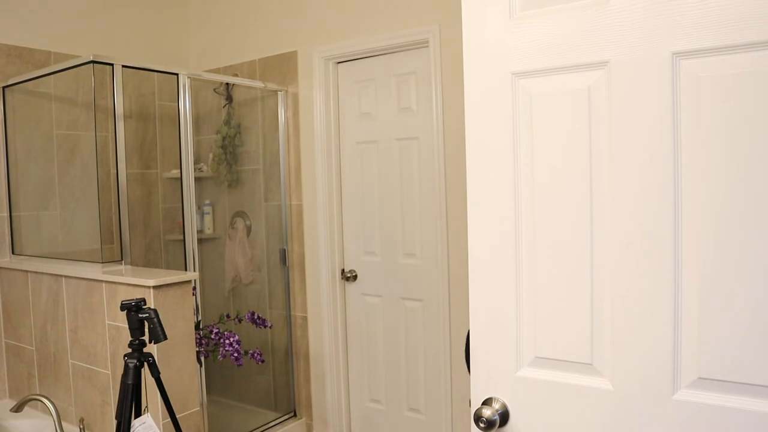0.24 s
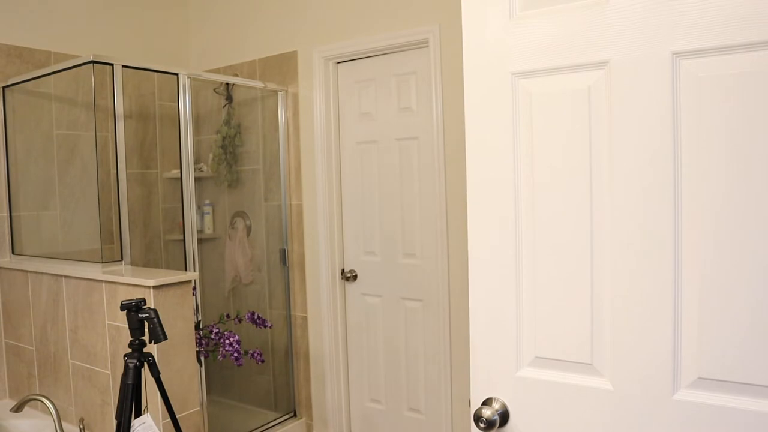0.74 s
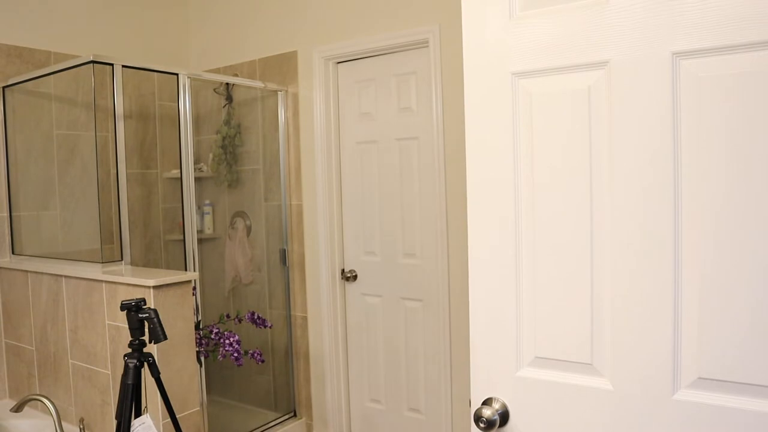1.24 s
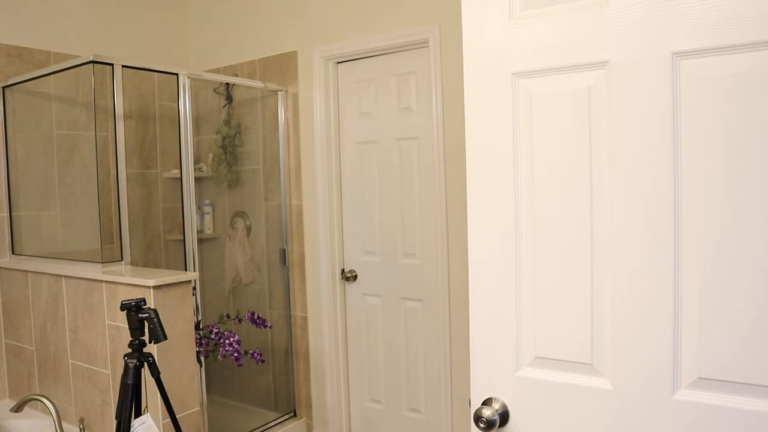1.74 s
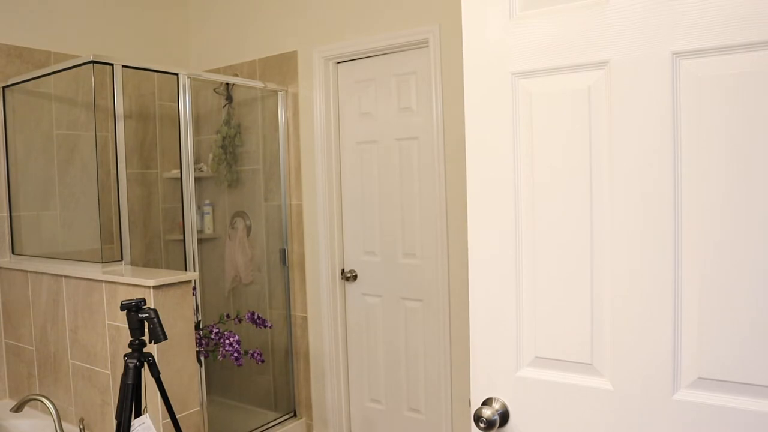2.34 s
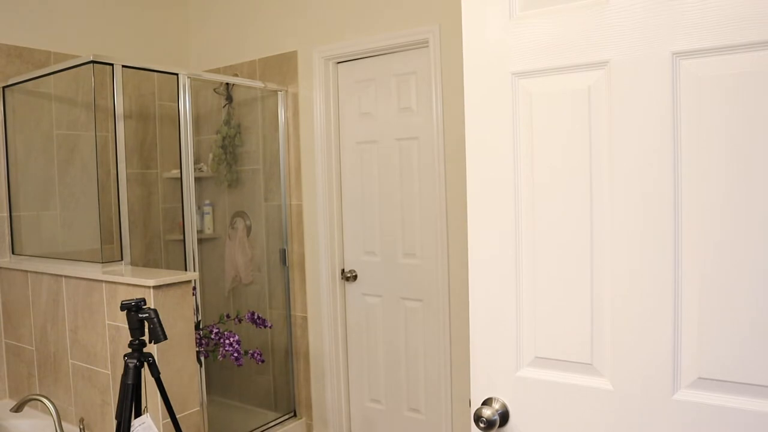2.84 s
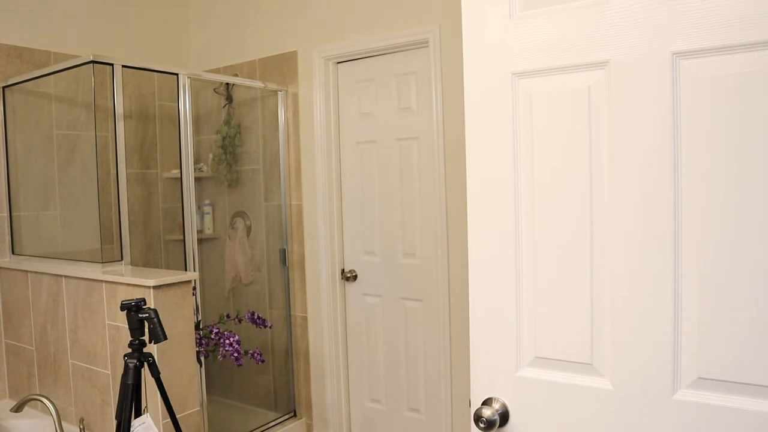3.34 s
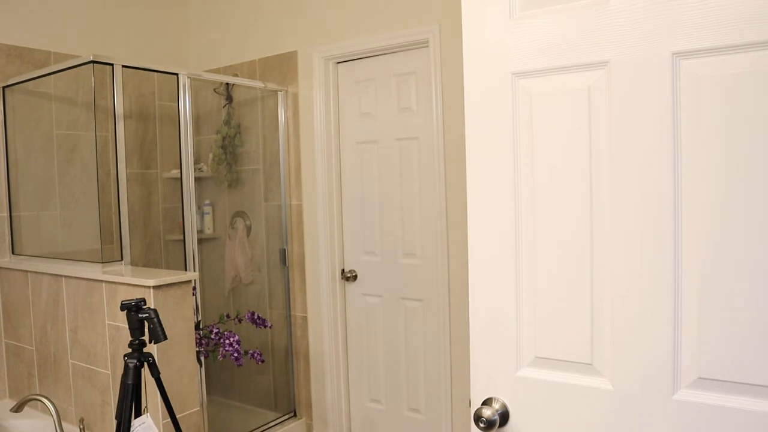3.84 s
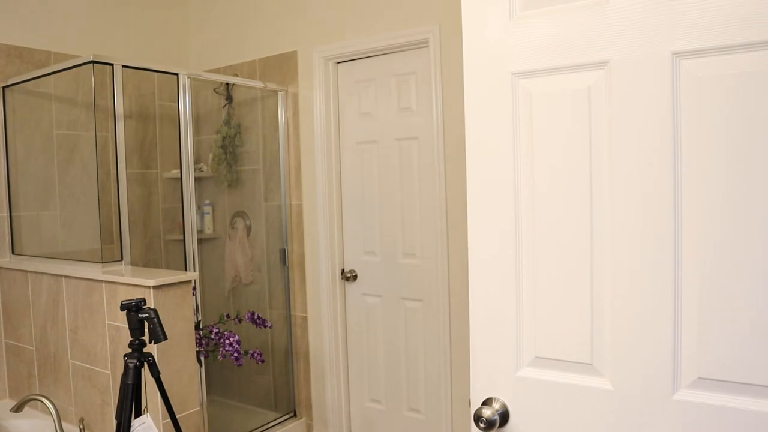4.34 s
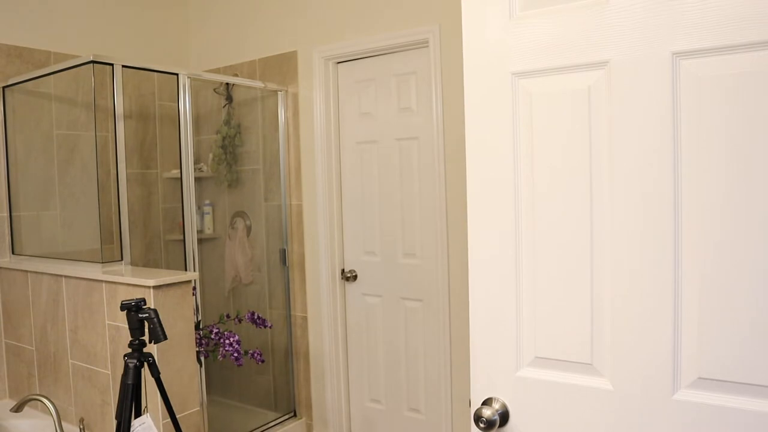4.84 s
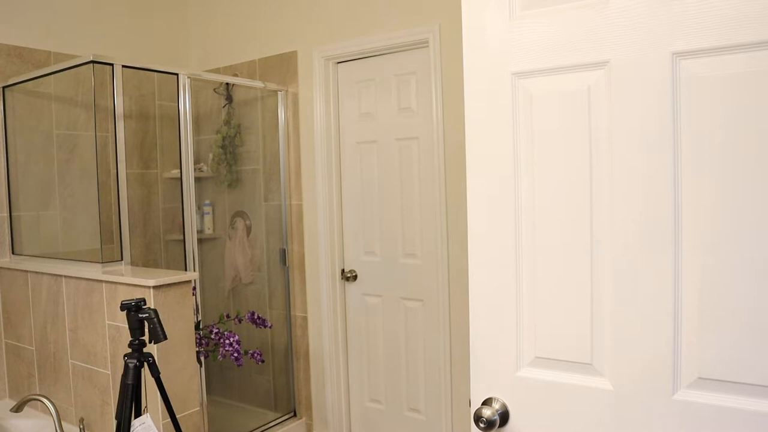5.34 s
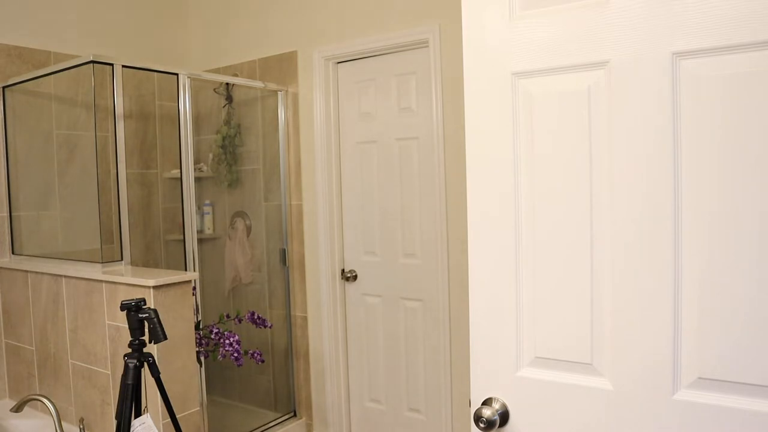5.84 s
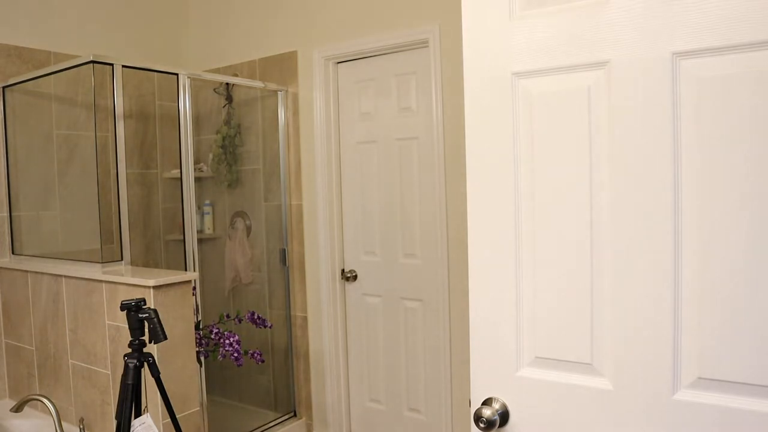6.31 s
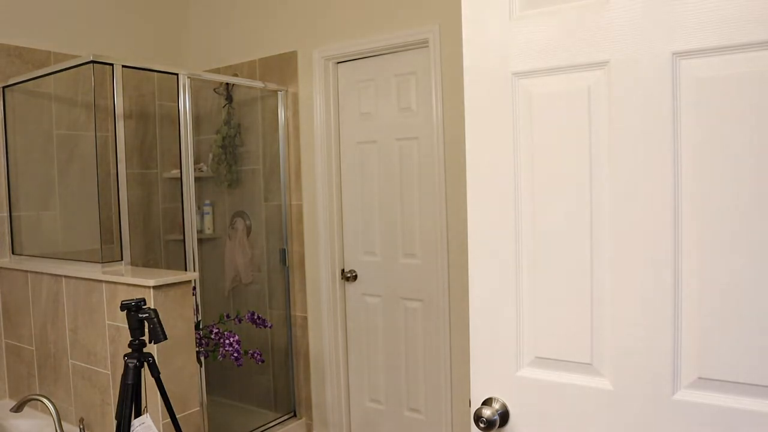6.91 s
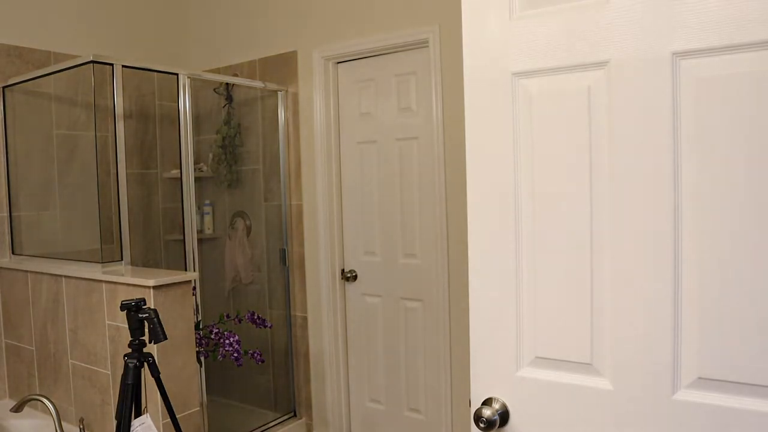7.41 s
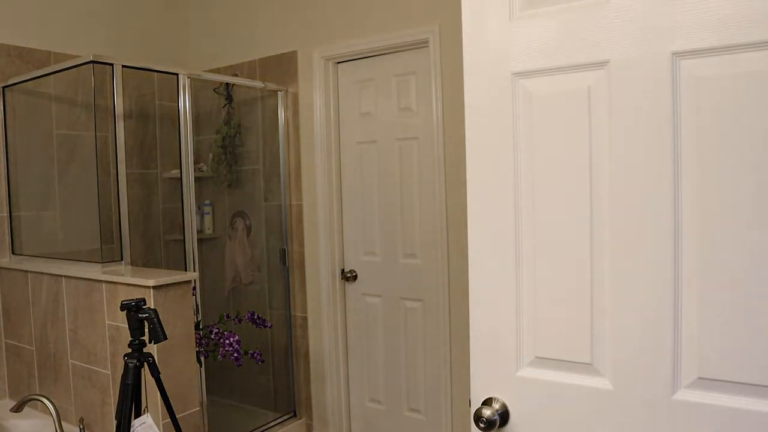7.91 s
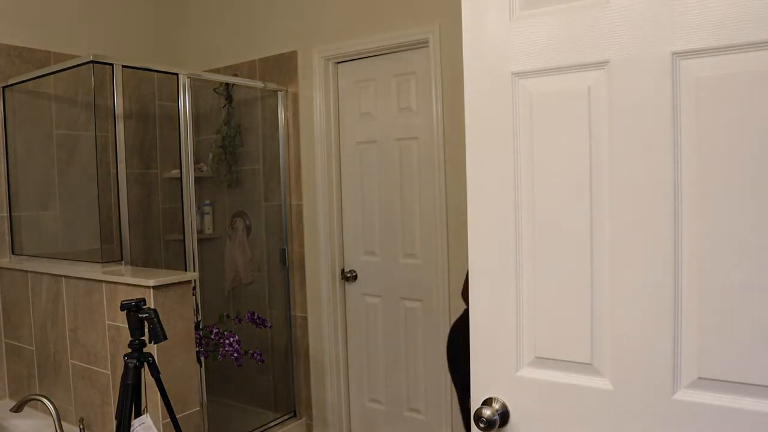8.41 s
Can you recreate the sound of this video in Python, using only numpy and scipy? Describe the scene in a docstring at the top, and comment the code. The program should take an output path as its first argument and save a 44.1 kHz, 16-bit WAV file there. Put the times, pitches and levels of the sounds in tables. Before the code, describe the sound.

Distant, reverberant stereo pickup of cabinet work in a hard bathroom: a quick opening thump, then clustered knocks and loose clatter with jar, tin and bottle clinks. A lull leaves only low air rumble and faint ticks. Short drawer slides end in heavy wooden slams, a brief gap follows, then the loudest slams, their echo dying away into light clothing rustle.

```python
"""Putting things away in a bathroom

Someone out of sight behind an open door puts things away in a tiled bathroom. Cupboard doors and drawers
knock, roll and slam: bursts of noise shake a ringing cabinet. Jars and other small things clink as sums of
fading tones, the cupboard air booms, and clothes swish as fine grains of noise. Knocks, rolls and clinks arrive
mostly as room echo made of fading noise. Filtered noise makes the ventilation rumble below it all.
"""
import sys
import numpy as np
from scipy import signal
from scipy.fft import rfft, irfft, next_fast_len
from scipy.io import wavfile
from scipy.ndimage import uniform_filter1d

SR = 44100
rng = np.random.default_rng(int(sys.argv[2]) if len(sys.argv) > 2 else 0)


def generate_wav(signal):
    """Clip the signal to [-1, 1] and save it as 16-bit WAV at the path in sys.argv[1]."""
    frames = np.transpose(np.atleast_2d(signal))
    scaled = np.clip(frames, -1, 1) * 32767
    pcm = np.round(scaled).astype(np.int16)
    wavfile.write(sys.argv[1], SR, pcm)


N = 382347

# Tones of the small hard things that the list of taps names:
# (pitch_hz, level_db against each other, fade_s for a fall of 60 dB)
JAR = [(2264, 5, 0.024), (4800, -5.5, 0.013)]
BOTTLES = [(1573, 15, 0.08), (1570, 4, 0.063), (2660, 7.5, 0.11), (3600, 1, 0.093), (3880, -1, 0.1),
           (4750, 4.5, 0.076), (5460, -4, 0.05)]
CUP = [(1210, 1.8, 0.099), (3830, 0.19, 0.027)]
BOX = [(684, 1, 0.17), (1410, -9, 0.085)]
TUB = [(727, 3.5, 0.068), (2120, 16.5, 0.0044), (3210, 0, 0.03)]
CATCH = [(4080, 20, 0.0098), (3900, 11, 0.0085), (1850, 8, 0.028), (5700, 7, 0.01), (8150, 11, 0.0064)]
CAP = [(1800, 0, 0.005)]
TIN = [(2118, 14, 0.062), (3340, 4, 0.05), (4430, 2, 0.11)]


def undb(db):
    """Turn a level in dB into a plain gain."""
    return 10 ** (np.asarray(db) / 20)


def level(x, db):
    """Scale a sound to an rms (average) level in dB."""
    return x * undb(db) / np.sqrt(np.mean(x ** 2))


def colour(x, points):
    """Filter by (Hz, dB) points joined by lines on a log-frequency axis."""
    hz, db = np.transpose(points)
    size = next_fast_len(len(x))
    bins = np.maximum(np.arange(size // 2 + 1) * SR / size, 1)
    gains = undb(np.interp(np.log(bins), np.log(hz), db))
    return irfft(rfft(x, size) * gains, size)[:len(x)]


def even(x, width_hz):
    """Level out chance peaks of the spectrum that are broader than the width."""
    spectrum = rfft(x)
    bins = int(width_hz * x.shape[-1] / SR) + 1
    local_power = uniform_filter1d(np.abs(spectrum) ** 2, bins)
    return irfft(spectrum / np.sqrt(local_power), x.shape[-1])


def line(points):
    """Gain along (s, dB) points, practically silent outside them."""
    s, db = np.transpose(points)
    return undb(np.interp(np.arange(N) / SR, s, db, left=-200, right=-200))


def ring(modes, seconds=.5):
    """A struck thing's fading tones after one blow, scaled to unit energy."""
    t = np.arange(int(seconds * SR)) / SR
    y = 0
    for hz, db, t60 in modes:
        fade = np.exp(-np.log(1000) * t / t60)  # down 60 dB after t60 seconds
        y = y + undb(db) * np.sin(2 * np.pi * hz * t) * fade
    return y / np.sqrt(np.sum(y ** 2))


def through(x, response):
    """Let a sound excite a response (convolution), cut to the scene's length."""
    return signal.fftconvolve(x, response)[:N]


def grit(per_s, scatter_db):
    """Random small impacts of uneven size, rms 1."""
    hits = (rng.random(N) < per_s / SR) * rng.standard_normal(N)
    unevenness = np.minimum(rng.exponential(size=N), 2)
    return level(hits * undb(scatter_db * unevenness), 0)


def knocks(sharpness=3.85, edge_s=0.002, count=4):
    """Doors, drawers and things set down: quickly dying bursts of contacts, taking turns at a few places."""
    # Blows: (start_s, panel_force_db, thud_db over panel, crack_db over panel, panel_pitch_hz,
    # hardness in dB per octave of treble tilt)
    blows = [(0.223, 11.5, -20, 1, 560, 3), (0.233, 17, -4.5, -5, 606, -3.5),
             (0.286, 4.5, 9, -7, 423, -2.5), (0.757, 3, 16, -6, 710, 1.5), (0.779, 8.5, 8, -11.5, 700, 1.5),
             (0.886, -1.5, 15, -1.5, 490, 3), (1.006, 13.5, 2.5, -9.5, 1060, 1.5),
             (1.02, 18.5, -11, -14, 465, -6.5), (1.312, -11.5, 20, 13.5, 538, 4),
             (1.453, -4.5, 13.5, -1, 750, -1), (1.556, 11, 3, -9.5, 1160, -5),
             (1.666, 9.5, 11, -4.5, 790, -2.5), (1.697, 9.5, -19, -4.5, 445, 2.5),
             (1.873, 22, 0.5, -9, 745, 4), (1.885, 25, -9, -12.5, 385, -6.5),
             (1.945, 13.5, -6, -16, 407, -6.5), (2.139, 16, 2.5, -8, 700, -3), (2.232, 12.5, 3, -9, 490, 7),
             (2.423, 18.5, -4.5, -11.5, 388, 4.5), (2.555, 8, -0.5, -6, 905, -0.5),
             (2.604, 11, 3, -9, 650, 3), (2.685, 12.5, 6.5, -16.5, 450, -4),
             (2.778, 3, 2, -15.5, 1180, -10.5), (2.911, 2.5, 6, -12.5, 1190, -2),
             (3.157, 2.5, 8, -5, 910, 3.5), (3.245, -5.5, 4, 3, 1110, 2),
             (3.395, -16.5, -13, 10.5, 1020, 1.5), (3.451, 4.5, 3, -10, 850, -5.5),
             (3.493, -3, 7.5, -16, 850, -12), (3.637, 3, -22, -3, 850, -2.5), (3.694, 4, 4, -7, 600, -3),
             (3.738, 10, -8, -7, 810, -6), (3.785, 3, 0.5, -6.5, 804, -6.5),
             (5.652, -0.5, 0, -1, 670, -1.5), (5.773, 13.5, 2, -7, 746, 2),
             (5.827, 9.5, 6.5, -13.5, 550, 3), (5.885, 9.5, 3, -12, 684, -2),
             (6.044, 27, -13, -11.5, 637, -2.5), (6.066, 25, -1, -5, 585, -1.5),
             (6.113, 23.5, 2.5, -11.5, 690, -3), (7.197, 11, -3.5, -9.5, 556, 6.5),
             (7.256, 30.5, -8, -13.5, 690, -7), (7.305, 19.5, 2.5, -14.5, 676, -1.5),
             (7.462, 32, -11.5, -13, 850, -2), (7.496, 18, -2, -25, 820, 3), (7.553, 26, -1.5, -7, 525, -2),
             (7.572, 24, 0, -13.5, 613, -3.5), (7.614, 12.5, -1, -28, 580, 12.5)]
    rattle_s = 0.0095  # time constant of the dying contacts
    thud_rise_s = 0.0041  # time constant: the carcass gives way slowly
    ripple_db, ripple_hz = 2.2, 130  # each struck edge has short resonances of its own: depth, spacing
    force, size = np.zeros((count, 3, N + SR)), SR // 5
    age_s = np.arange(size) / SR
    contacts = rng.standard_normal((len(blows), 3, size))
    edge_hz = np.arange(ripple_hz, SR / 4, ripple_hz)
    ripples = rng.standard_normal((len(blows), len(edge_hz)))
    for k, (s, db, thud_db, crack_db, hz, tilt_db) in enumerate(blows):
        burst = even(contacts[k] * np.exp(-age_s / rattle_s), 48)
        burst[:, size // 2:] = 0  # no rattle outlasts a tenth of a second
        thud, panel, crack = burst
        thud = thud * (1 - np.exp(-age_s / thud_rise_s))
        # the spot that is struck favours the panel tones near one pitch
        panel = signal.lfilter(*signal.iirpeak(hz, sharpness, fs=SR), panel)
        # the hard edges meet a moment after the first push
        crack = crack * (1 - np.exp(-age_s / edge_s))
        # harder contacts tilt the crack towards the treble
        crack = colour(crack, [(700, -2 * tilt_db), (11200, 2 * tilt_db)])
        crack = colour(crack, np.transpose([edge_hz, ripple_db * ripples[k]]))
        crack = crack * undb(-ripple_db / 2)
        gains = undb(db + np.array([[thud_db], [0], [crack_db]]))
        start = int(s * SR)
        force[k % count, :, start:start + size] += gains * np.array([thud, panel, crack])
    return [cabinet(*place[:, :N]) for place in force]


def cabinet(thud, panel, crack):
    """Forces on the frame (carcass), panels and hard surfaces, each through its own resonances."""
    # Tones of the frame and of its panels: (pitch_hz, level_db against each other, fade_s for 60 dB)
    carcass_modes = [(170.3, 1, 0.37), (221.8, 19, 0.045), (281.6, 17.5, 0.06), (295.6, 10, 0.084),
                     (345.6, 2.5, 0.14), (407, 4.5, 0.061)]
    panel_modes = [(404.4, 12.5, 0.03), (533, -5.5, 0.37), (574, -1, 0.17), (688.5, 9, 0.038),
                   (794, 11.5, 0.025), (882, -1, 0.018), (1095, 3.5, 0.052), (1351, 2, 0.091),
                   (2070, 0, 0.026)]
    # Colour of hard surfaces meeting: (frequency_hz, level_db per Hz, relative)
    crack_colour = [(400, -14), (900, -2.5), (1500, -3.5), (2400, -8.5), (3300, -14.5), (5000, -18.5),
                    (8500, -30.5), (12000, -32.5), (15000, -65)]
    noise = colour(rng.standard_normal(SR), crack_colour)
    bright = colour(crack, crack_colour) / np.std(noise)  # the colour alone adds no loudness
    return through(thud, ring(carcass_modes)) + through(panel, ring(panel_modes)) + bright


def rolls(thud_db=-3, panel_db=-6):
    """Drawer runners and loose contents bump along as random impacts and shake the same cabinet."""
    # Hands rummaging in the open drawers: (time_s, level_db before the shares below)
    rummage = [(0.8, -73), (0.95, -25.5), (1.14, -38), (1.36, -35), (1.57, -28), (2.16, -33), (2.34, -25),
               (2.64, -27.5), (2.92, -47), (3.13, -29.5), (3.28, -52), (3.55, -37), (3.7, -30.5),
               (3.94, -49.5), (4.6, -55)]
    # Drawers on their rails: (start_s, length_s, end_level_db before the shares below,
    # swell_db from start to end, a fall if negative)
    slides = [(5.707, 0.22, -23.5, 23), (5.941, 0.09, -15, 24), (7.191, 0.25, -38.5, -19),
              (7.366, 0.085, -13, 14)]
    hands_scrape_db, rails_scrape_db = -14, -15.5
    hands = line(rummage)
    rails = sum(line([(s, db - swell_db), (s + length, db)]) for s, length, db, swell_db in slides)
    body = (hands + rails) * grit(600, 2.9)
    scrape = undb(hands_scrape_db) * hands + undb(rails_scrape_db) * rails
    scrape = scrape * grit(2500, 3.1)
    return cabinet(undb(thud_db) * body, undb(panel_db) * body, scrape)


def clinks():
    """Small hard things: one sharp blow sets off each object's own fading tones."""
    # Small things struck: (start_s, blow_db, tones of the thing)
    taps = [(1.015, 2.5, JAR), (1.887, 4.5, TIN), (2.422, 6, BOTTLES), (2.621, -4, CUP), (4.14, -14.5, TUB),
            (4.27, -15.5, TUB), (5.401, -13, CATCH), (5.66, -3, BOX), (6.633, -11, CAP)]
    out = np.zeros(N + SR)
    for s, db, modes in taps:
        start = int(s * SR)
        out[start:start + SR // 2] += undb(db) * ring(modes)
    return out[:N]


def booms():
    """A door swung quickly pushes the cupboard's air, which rings low after each soft, uneven push."""
    # Air pushes: (start_s, push_db)
    pushes = [(0.26, 9.5), (5.777, 15.5), (6.068, 6), (7.254, 20), (7.501, -11)]
    # Tones of the air inside: (pitch_hz, level_db against each other, fade_s for 60 dB)
    cavity_modes = [(97, -7, 0.36), (127, 11, 0.3), (161.7, 18, 0.19)]
    push_s = 0.031  # the push is strongest after half of this
    force, size = np.zeros(N + SR), SR // 5
    age = np.arange(size) / (push_s * SR)
    puffs = rng.standard_normal((len(pushes), size))
    for (s, db), puff in zip(pushes, puffs):
        start = int(s * SR)
        force[start:start + size] += undb(db) * even(puff * age * np.exp(-2 * age), 48)
    # keep the low notes only
    return colour(through(force, ring(cavity_modes)), [(25, -14), (60, 0), (200, 0), (400, -30)])


def swish():
    """Cloth sliding on cloth: dense fine grains, each stroke swelling and fading."""
    # Strokes: (peak_s, peak_level_db, rise_s, fall_s)
    strokes = [(0.045, -54, 0.017, 0.41), (5.278, -57.5, 0.03, 0.18), (8.25, -46.5, 0.092, 0.11),
               (8.375, -37.5, 0.067, 0.15), (8.549, -41, 0.03, 0.18)]
    # Colour of the cloth: (frequency_hz, level_db per Hz, relative)
    cloth_colour = [(710, -42), (1200, -7.5), (4090, -0.5), (9030, -9), (11600, -5.5), (12300, -10),
                    (15000, -60)]
    span_db = 17.5  # how far a stroke swells and fades
    loudness = 0
    for s, db, rise, fall in strokes:
        loudness = loudness + line([(s - rise, db - span_db), (s, db), (s + fall, db - span_db)])
    return loudness * level(colour(grit(9600, 0.36), cloth_colour), 0)


def vent():
    """Ventilation: broad air noise; the bass gathers on room resonances and so wavers."""
    # Colour of the air noise: (frequency_hz, level_db per Hz, relative)
    air_colour = [(12, -58), (20, -44), (37, -9), (50, -18), (59, 0), (92, -2.5), (124, 5.5), (151, -11.5),
                  (294, -15), (357, -21.5), (796, -26), (1110, -24), (11400, -49), (15000, -74)]
    # Room resonances in the rumble: (pitch_hz, width_hz, level_db)
    resonances = [(72, 4.6, -48.5), (122.5, 10.5, -44.5)]
    out = level(colour(rng.standard_normal(N), air_colour), -41.5)  # dB
    for hz, width, db in resonances:
        hum = signal.lfilter(*signal.iirpeak(hz, hz / width, fs=SR), rng.standard_normal(N))
        out = out + level(hum, db)
    return out


def room():
    """A weak direct path, then tile echo: noise that builds up round the door, each pitch band fading alone."""
    # How long the echo lasts: (frequency_hz, fade_s for 60 dB)
    fades = [(60, 0.75), (125, 0.55), (250, 0.41), (500, 0.55), (1000, 0.66), (2000, 0.62), (4000, 0.62),
             (8000, 0.52), (16000, 0.12)]
    rise_s, direct_db = 0.0043, -11.5  # direct level before the final evening out
    early_db, early_s = 2, 0.033  # nearby walls: level over the tail, time constant
    t, out, air = np.arange(SR) / SR, 0, rfft(rng.standard_normal(SR))
    centres = np.log(np.transpose(fades)[0])
    log_hz = np.log(np.arange(len(air)) + 1)
    build = (1 - np.exp(-t / rise_s)) * (1 + undb(early_db) * np.exp(-t / early_s))
    # each row of the identity matrix picks out one band, overlapping its neighbours
    for share, (hz, t60) in zip(np.eye(len(fades)), fades):
        band = irfft(air * np.interp(log_hz, centres, share))
        fade = build * np.exp(-np.log(1000) * t / t60)
        out = out + band * fade / np.sqrt(np.sum(fade ** 2))
    out[0] = undb(direct_db)
    return even(out, 24) * (np.arange(SR) < SR * .9)  # the echo stops at 0.9 s


def scene():
    """Mid (centre) and side (width) hear different echoes of each place; the microphone widens the treble."""
    # Stereo width of the knocks, rolls, clinks and cloth, then of the ventilation:
    # (frequency_hz, side_minus_mid_db)
    hits_width = [(60, -44), (110, -46), (200, -31), (380, -8), (690, -4.5), (1270, -1.5), (2340, 3.5),
                  (4320, 5), (7950, 8), (14600, 11)]
    vent_width = [(60, -67), (110, -26.5), (200, -5.5), (380, 2.5), (690, 5.5), (1270, 2), (2340, 5.5),
                  (4320, 7), (7950, 5.5), (14600, 11)]
    left_db = 0.34  # left over right
    places = knocks() + [rolls() + clinks()]
    # the knocks, rolls and clinks carry no deep bass: cut below 78 Hz
    places = signal.sosfilt(signal.butter(4, 78, "high", fs=SR, output="sos"), places)
    mid, side = (sum(through(dry, room()) for dry in places) + swish() for _ in range(2))
    mid = mid + booms() + vent()
    side = colour(side, hits_width) + colour(vent(), vent_width)
    return np.array([mid + side, mid - side]) * undb(np.array([[left_db], [-left_db]]) / 2)


def record(dry):
    """Gain control eases down after loud passages; the recorder rounds the peaks and cuts the top."""
    knee_db, slope, memory_s = -35, 0.084, 1
    keep = np.exp(-1 / (memory_s * SR))
    power = signal.lfilter([1 - keep], [1, -keep], np.mean(dry ** 2, axis=0))
    eased = dry * (1 + power / undb(2 * knee_db)) ** -slope
    rounded = np.tanh(0.55 * eased) / 0.65
    top_cut = signal.ellip(8, .2, 70, 14700, fs=SR, output="sos")  # Hz
    return signal.sosfilt(top_cut, rounded)


dry = scene()
out = record(dry)
generate_wav(out)
```